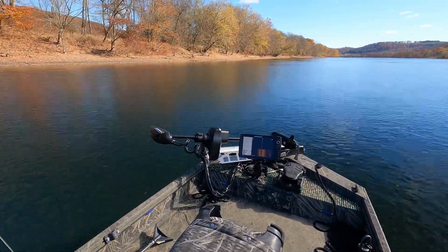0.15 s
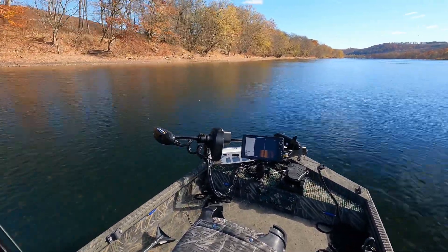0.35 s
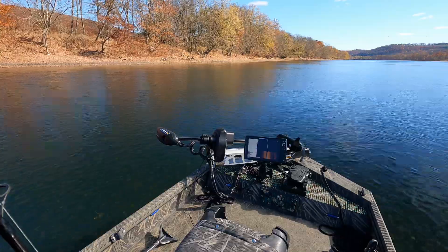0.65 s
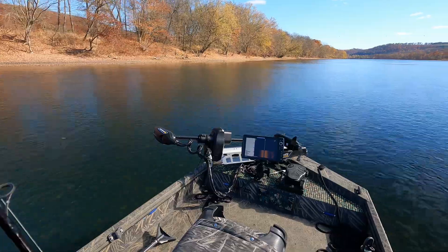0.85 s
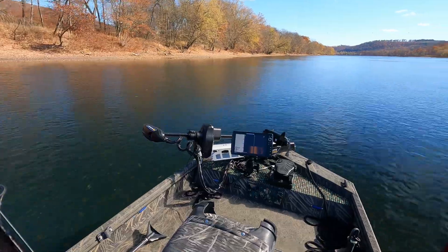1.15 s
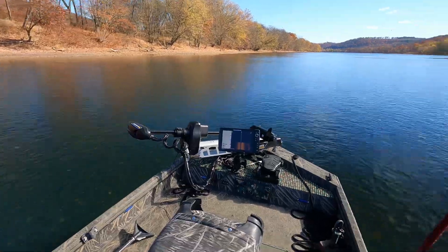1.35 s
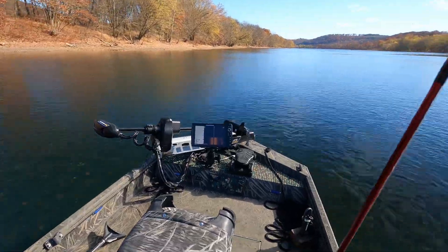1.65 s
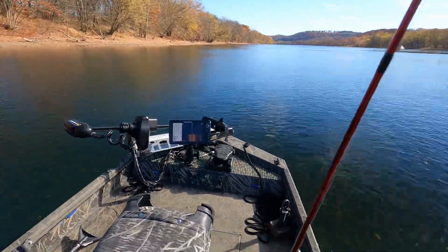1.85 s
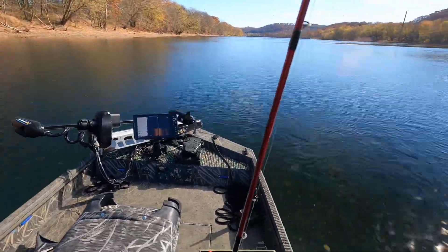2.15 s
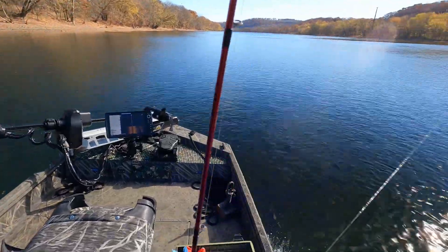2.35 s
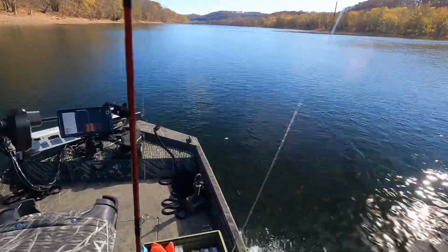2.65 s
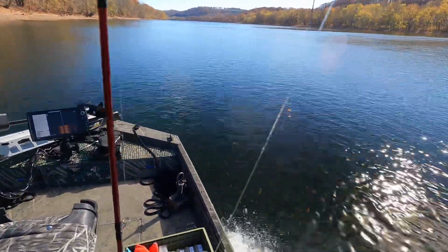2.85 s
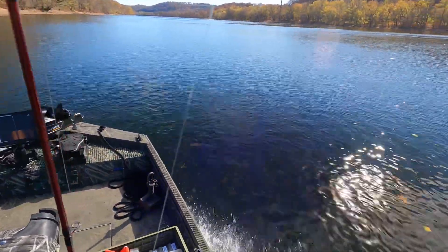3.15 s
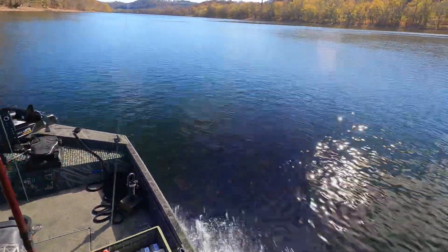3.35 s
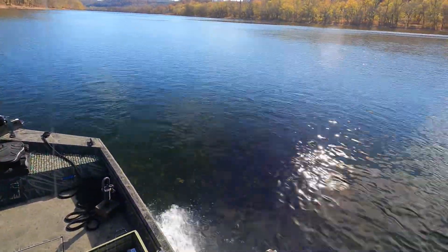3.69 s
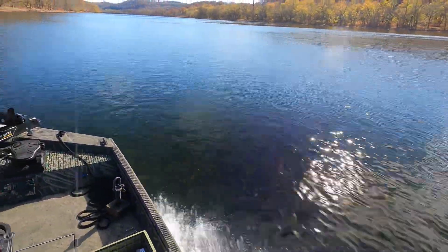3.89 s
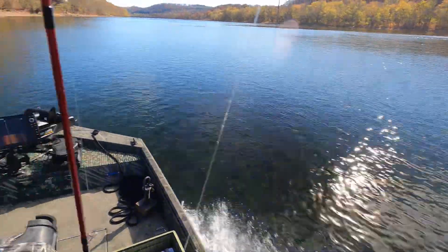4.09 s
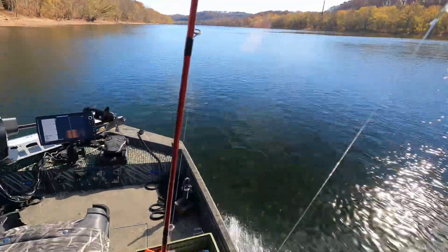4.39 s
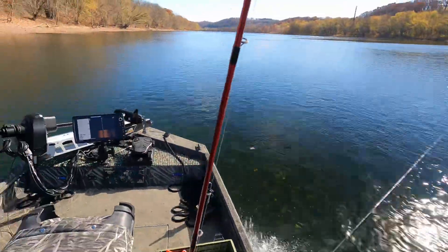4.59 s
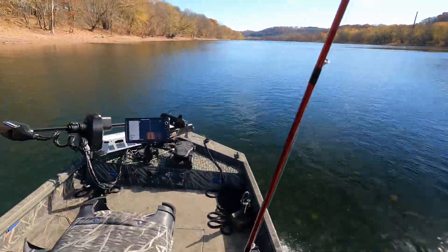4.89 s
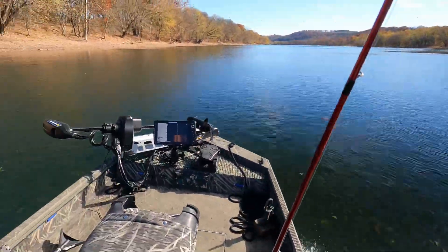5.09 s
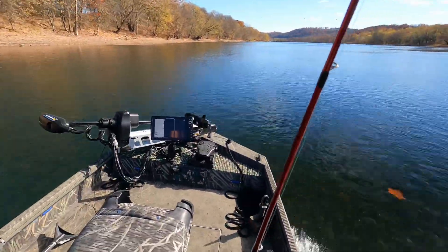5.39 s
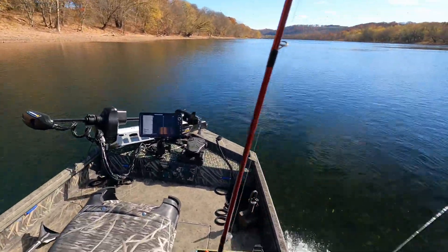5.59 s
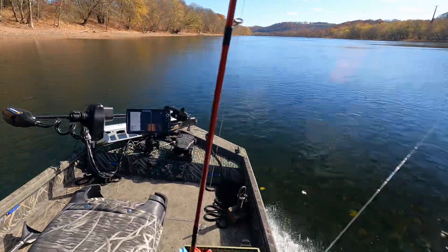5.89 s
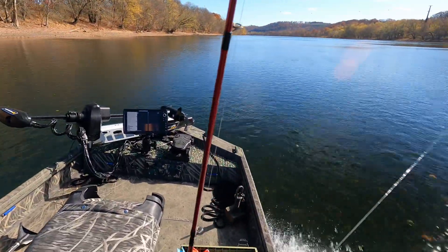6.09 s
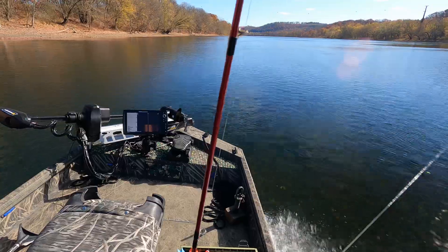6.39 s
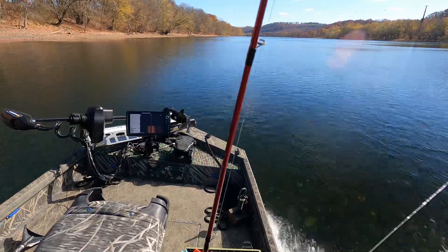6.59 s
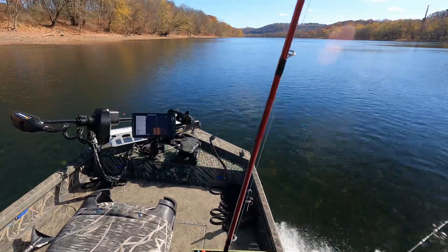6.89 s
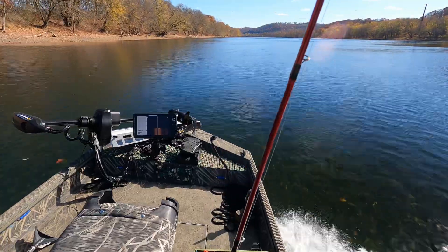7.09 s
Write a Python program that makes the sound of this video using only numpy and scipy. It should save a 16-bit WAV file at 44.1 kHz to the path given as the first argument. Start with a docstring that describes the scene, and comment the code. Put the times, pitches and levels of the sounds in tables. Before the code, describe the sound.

A thick, low motor hum dominates throughout, barely changing in pitch, heard close from the boat's deck. Beneath it the hull thuds irregularly as small waves strike. Fine watery sizzle runs along the side and brightens when spray rises. At first the wind is mild; later it flutters, slaps and tears at the unprotected microphone in uneven bursts. Outdoors, without echo.

```python
"""A four-cylinder outboard drones at its firing rate as a jet boat cruises up a river, heard from on board.
Sines at multiples of the crank speed make the drone and its overtones; pulsing noise makes the clatter.
Ripples thump the metal hull as short low tones; bow spray hisses as filtered noise with dense droplets.
Wind rumbles, buffets and tears at the microphone as shaped noise, and a fast limiter holds the bass down."""
import sys
import numpy as np
from scipy import signal
from scipy.fft import rfft, irfft
from scipy.io import wavfile

SR = 44100
rng = np.random.default_rng(int(sys.argv[2]) if len(sys.argv) > 2 else 0)


def persist_wave(psi):
    """Save psi, clipped to +-1, as 16-bit WAV."""
    counts = np.round(np.clip(psi, -1, 1) * 32767).astype(np.int16)
    wavfile.write(sys.argv[1], SR, np.atleast_2d(counts).T)


N = 319284
TIME = np.arange(N) / SR  # seconds

# All spectra give only a shape: the noise they colour is brought to unit rms.
# Crankshaft speed. Each row: time in seconds, speed in turns per second.
CRANK_SPEED = [(0, 39.87), (.35, 39.88), (.6, 40.22), (.9, 40.26), (1.05, 40.42), (1.25, 40.12),
               (1.8, 39.98), (2.5, 40.08), (3.4, 40.05), (3.85, 39.95), (4.7, 40.05), (5.55, 40.1),
               (5.95, 40.28), (6.55, 40.08), (7.24, 40)]
# Drone at four firings a turn. Each row: time in seconds, relative level in dB.
DRONE_LEVEL = [(0, -5), (1.5, -7), (2, -7.5), (2.5, -7), (4.05, -5.5), (4.35, -7), (5.3, -11), (5.8, -7),
               (6.7, -6), (7.24, -10.5)]
# Weaker engine lines. Each row: multiple of the crank speed, relative level in dB.
CRANK_ORDERS = [(1, -29.5), (2, -25.5), (3, -30.5), (5, -18), (6, -21.5), (7, -25.5), (8, -23.5), (10, -27),
                (12, -41.5), (13, -34.5), (14, -29.5), (16, -34.5), (17, -36.5), (19, -40), (20, -50),
                (22, -48.5), (23, -41.5), (25, -44.5), (38, -51.5), (42, -44.5)]
# Engine clatter and exhaust hiss. Each row: frequency in Hz, relative density in dB per Hz.
CLATTER_SPECTRUM = [(60, -8), (250, -6), (550, -7.5), (900, -7), (1400, -12), (1750, -15), (2300, -18.5),
                    (4000, -31), (9000, -58.5)]
# Rise and fall of the engine's lines and clatter together. Each row: time in seconds, gain in dB.
UPPER_ENGINE_GAIN = [(0, -1), (1.7, -1), (2.0, -6.5), (2.7, -2.5), (3.3, -6.5), (3.9, -1.5), (4.5, -2),
                     (5.5, -6.5), (6.3, -5.5), (6.8, -5), (7.24, -11)]

# Ripples striking the hull. Each row: middle of the thump in seconds, relative peak of its swell in dB.
HULL_THUMPS = [(0.719, -8), (.76, -7.5), (0.853, -9), (0.922, -5.5), (0.985, -5), (1.009, -6), (1.44, -7),
               (1.784, -16), (2.028, -5.5), (2.254, -5), (2.504, -9), (2.804, 0), (3.12, -10),
               (4.144, -0.5), (4.69, -11), (5.136, -11), (5.762, -14), (6.422, -8.5), (6.484, -7.5),
               (7.095, -7)]
THUMP_S = 0.011  # time constant of the swell and fade, seconds

# Bow spray hiss, which sinks under the strong wind near 1.95 and 4.95 s.
# Each row: time in seconds, relative level in dB.
SPRAY_LEVEL = [(0, -55), (1.72, -53.5), (1.95, -59.5), (2.15, -54.5), (2.95, -55), (3.35, -50.5),
               (4.12, -48), (4.38, -54.5), (4.62, -53), (4.95, -56.5), (5.45, -54.5), (6.1, -50),
               (6.7, -53), (7.24, -52)]
# Water rushing along the hull. Each row: frequency in Hz, relative density in dB per Hz.
WATER_SPECTRUM = [(300, 0.5), (1000, -4), (2000, -7), (3000, -1.5), (4200, -2.5), (5600, -7.5), (8200, -10),
                  (9500, -17), (11000, -26), (12500, -35), (15500, -57.5)]
# Sizzling sheet of water off the bow. Each row: time in seconds, centre in Hz, level in dB.
BOW_SHEET = [(0, 6890, -63), (.55, 6820, -65), (.8, 7270, -60), (1.72, 7690, -61), (1.9, 7530, -81),
             (2.45, 7370, -66.5), (4.2, 7060, -79.5), (4.6, 6650, -66.5), (5.4, 6700, -65),
             (5.7, 7900, -71), (7.24, 7850, -66.5)]
FIZZ_SLOPE = .6  # extra dB of top fizz for each dB of spray above its mean level

# Wind pressure on the microphone. Each row: time in seconds, relative level in dB.
WIND_PRESSURE = [(0, -25), (1.66, -26), (1.78, -20), (2.03, -19), (2.1, -24), (2.4, -31), (2.52, -24.5),
                 (3.05, -27.5), (3.3, -28), (4.15, -24.5), (4.3, -18.5), (4.44, -25.5), (4.7, -18.5),
                 (5.55, -18.5), (5.73, -31), (6.15, -25.5), (6.68, -31), (7.08, -19)]
# Low rumble of the wind. Each row: frequency in Hz, relative density in dB per Hz.
RUMBLE_SPECTRUM = [(10, -12), (25, -6.5), (45, -0.5), (75, 1.5), (110, -1.5), (170, 6), (300, -18),
                   (700, -70.5), (4000, -110)]
# Lumpy buffeting. Each row: frequency in Hz, relative density in dB per Hz.
BUFFET_SPECTRUM = [(60, -7.5), (130, 1), (210, 8.5), (300, 1), (450, -6), (800, -17.5), (1300, -40.5),
                   (3000, -63), (12000, -100)]
# Gusts across the microphone opening. Each row: start in seconds, length in seconds, relative level in dB,
# further level of their treble in dB.
GUST_EVENTS = [(1.775, 0.11, -32, -11), (1.982, 0.053, -33.5, -13), (2.492, 0.17, -28.5, 3.5),
               (2.658, .42, -28, -9), (4.246, 0.12, -21.5, -2.5), (5.141, .32, -28, -7.5),
               (5.959, 0.12, -24, 0.5), (6.119, .035, -26, 1.5), (6.202, 0.06, -25.5, -3),
               (6.344, 0.12, -30.5, -8), (7.238, 0.12, -25.5, 4)]
# Tearing air at the opening. Each row: frequency in Hz, relative density in dB per Hz.
TEARING_SPECTRUM = [(100, -19.5), (280, -6), (430, 4.5), (700, -0.5), (1100, -5.5), (1700, -11.5),
                    (2600, -16.5), (4000, -23.5), (5200, -38), (9000, -58.5), (13000, -89)]
# Sharp slaps of air on the microphone. Each row: middle in seconds, level in dB.
AIR_SLAPS = [(1.768, -32), (2.479, -25.5), (4.436, -28), (4.948, -39), (6.21, -32), (6.458, -33),
             (7.009, -33)]
GRAZE_DB = -26.5  # slight tearing that is always there, dB against the wind pressure
PUSH_DB = -3  # low rumble that a gust brings, dB against its tearing
# a longer gust builds and dies more slowly: time constants as shares of its length
GUST_RISE, GUST_FALL = 0.4, 0.2
SWELL_DB = 1  # growth from the start of a gust to its end
TREBLE_POWER = 1.7  # the treble grows faster than the gust itself

EDGE_HZ = 15700  # upper band limit


def gain_of(db):
    """Logarithmic level: decibels become an amplitude ratio."""
    return 10 ** (np.asarray(db) / 20)


def evened(x):
    """Power normalization: scales to unit rms."""
    return x / np.sqrt(np.mean(x ** 2) + 1e-20)


def curves(rows):
    """Linear interpolation: each column of a time table, sample by sample."""
    s, *columns = np.transpose(rows)
    return [np.interp(TIME, s, column) for column in columns]


def coloured(x, spectrum):
    """Spectral shaping: weights each frequency of x, then brings it to unit rms."""
    hz, db = np.transpose(spectrum)
    bins = np.fft.rfftfreq(N, 1 / SR)
    weight_db = np.interp(np.log(bins + 1), np.log(hz), db)
    return evened(irfft(rfft(x) * gain_of(weight_db), N))


def wander(rate_hz):
    """Low-pass random process: Gaussian-filtered noise of about the given bandwidth, at unit rms."""
    bins = np.fft.rfftfreq(N, 1 / SR)
    low_pass = np.exp(-.5 * (bins / rate_hz) ** 2)
    return evened(irfft(rfft(rng.standard_normal(N)) * low_pass, N))


def engine(drone_db=-5.0, lines_db=-10, waver=.25, clatter_db=-36, throb=0.23, drift=0.13):
    """Periodic excitation: firing yields a tone, wavering crank orders, and clatter that pulses with it."""
    angle = 2 * np.pi * np.cumsum(curves(CRANK_SPEED)[0]) / SR
    firing = 4 * angle
    drone = gain_of(curves(DRONE_LEVEL)[0] + drone_db) * np.sqrt(2) * np.sin(firing)

    # unequal cylinders fill in the other multiples of the crank speed
    lines = np.zeros(N)
    for multiple, db in CRANK_ORDERS:
        phase_drift = drift * np.sqrt(multiple) * wander(5.3)
        phase = round(multiple) * angle + phase_drift + 2 * np.pi * rng.random()
        lines += gain_of(db) * np.sqrt(2) * (1 + waver * wander(5.7)) * np.sin(phase)

    pulsing = 1 + throb * np.cos(firing) + 0.13 * np.cos(2 * angle)
    clatter = coloured(pulsing * rng.standard_normal(N), CLATTER_SPECTRUM)
    upper = gain_of(lines_db) * lines + gain_of(clatter_db) * clatter
    return drone + gain_of(curves(UPPER_ENGINE_GAIN)[0]) * upper


def hull(panel_hz=194, thump_db=0):
    """Panel resonance: each ripple swells and fades at the low resonance of the bottom panel."""
    out = np.zeros(N)
    chances = rng.uniform(-1, 1, (len(HULL_THUMPS), 2))
    for (s, db), (phase, detune) in zip(HULL_THUMPS, chances):
        t = TIME - s
        near = abs(t) < 4 * THUMP_S
        swell = gain_of(db + thump_db) * np.exp(-(t[near] / THUMP_S) ** 2)
        hz = panel_hz * (1 + .04 * detune)
        out[near] += swell * np.sin(2 * np.pi * hz * t[near] + np.pi * phase)
    return out


def water(rush_db=6.5, drops_per_s=2500, drop_share=0.29, churn_db=1.0, sheet_width_hz=340):
    """Superposed random impacts: dense droplets join a wash, and a thin sheet adds a narrow-band sizzle."""
    level_db, = curves(SPRAY_LEVEL)
    struck = rng.random(N) < drops_per_s / SR
    drop_gain = gain_of(2.1 * np.minimum(rng.exponential(1, N), 4))
    drops = struck * rng.standard_normal(N) * drop_gain
    rush = coloured(rng.standard_normal(N) + drop_share * evened(drops), WATER_SPECTRUM)

    # the top fizz rises and falls further than the rest of the hiss
    above_9khz = signal.butter(3, 9000, "high", fs=SR, output="sos")
    fizz = signal.sosfiltfilt(above_9khz, rush)
    rush = rush + fizz * (gain_of(FIZZ_SLOPE * (level_db - level_db.mean())) - 1)

    # two slow random signals on a carrier in quadrature make a narrow band of noise
    sheet_hz, sheet_db = curves(BOW_SHEET)
    angle = 2 * np.pi * np.cumsum(sheet_hz) / SR
    sheet = wander(sheet_width_hz) * np.cos(angle) + wander(sheet_width_hz) * np.sin(angle)
    return gain_of(level_db + rush_db + churn_db * wander(14)) * rush + gain_of(sheet_db) * sheet


def wind(rumble_db=-1, eddy_db=2.4, buffet_db=-1, flutter_db=1.64, tear_db=0, rip_db=1.65,
         slap_s=0.005, treble_hz=1800):
    """Turbulent pressure: low eddies and buffeting follow the wind; gusts and slaps add ragged tearing."""
    press_db, = curves(WIND_PRESSURE)
    force = gain_of(press_db + GRAZE_DB)
    sharp = np.zeros(N)
    for start, length, db, sharp_db in GUST_EVENTS:
        blow = gust(start, length)
        force = np.maximum(force, gain_of(db + tear_db) * blow)
        sharp = np.maximum(sharp, gain_of(db + tear_db + sharp_db) * blow ** TREBLE_POWER)

    # steady pressure and gusts add as powers
    push = np.hypot(gain_of(press_db + rumble_db), gain_of(PUSH_DB) * force)
    rumble = push * gain_of(eddy_db * wander(6)) * coloured(rng.standard_normal(N), RUMBLE_SPECTRUM)
    buffet_gain = gain_of(press_db + buffet_db + flutter_db * wander(35))
    buffet = buffet_gain * coloured(rng.standard_normal(N), BUFFET_SPECTRUM)
    slaps = sum(gain_of(db) * np.exp(-((TIME - s) / slap_s) ** 2) for s, db in AIR_SLAPS)

    tearing = coloured(rng.standard_normal(N), TEARING_SPECTRUM)
    # air that grazes the opening sheds smaller, brighter eddies
    high_pass = signal.butter(2, treble_hz, "high", fs=SR, output="sos")
    treble = signal.sosfiltfilt(high_pass, tearing)
    gusts = gain_of(rip_db * wander(98)) * (force * (tearing - treble) + sharp * treble)
    return rumble + buffet + slaps * tearing + gusts


def gust(start, length):
    """Exponential growth and decay: a gust builds, swells a little further and dies away."""
    early = np.maximum(start - TIME, 0)
    late = np.maximum(TIME - start - length, 0)
    progress = np.clip((TIME - start) / length, 0, 1)
    swell = gain_of(SWELL_DB * (progress - 1.5))
    return swell * np.exp(-(early / GUST_RISE + late / GUST_FALL) / length)


def scene():
    """Linear superposition: engine, hull, water and wind add at one microphone."""
    return (engine() + hull() + water() + wind())[None]


def record(dry, split_hz=330, ceiling_db=-8, knee=8, response_s=0.0017):
    """Envelope compression: a fast bass limiter lets thumps and gusts push the drone aside; then a band limit."""
    bass = signal.sosfiltfilt(signal.butter(3, split_hz, fs=SR, output="sos"), dry)
    pole = np.exp(-1 / (response_s * SR))
    # smoothed both forwards and backwards in time
    envelope = signal.filtfilt([1 - pole], [1, -pole], abs(signal.hilbert(bass)), padtype="even")
    held = bass / (1 + (envelope / gain_of(ceiling_db)) ** knee) ** (1 / knee)
    low_pass = signal.firwin(511, EDGE_HZ, window=("kaiser", 9), fs=SR)
    return signal.oaconvolve(dry - bass + held, low_pass[None], "same")


dry = scene()
out = record(dry)
persist_wave(out)
```